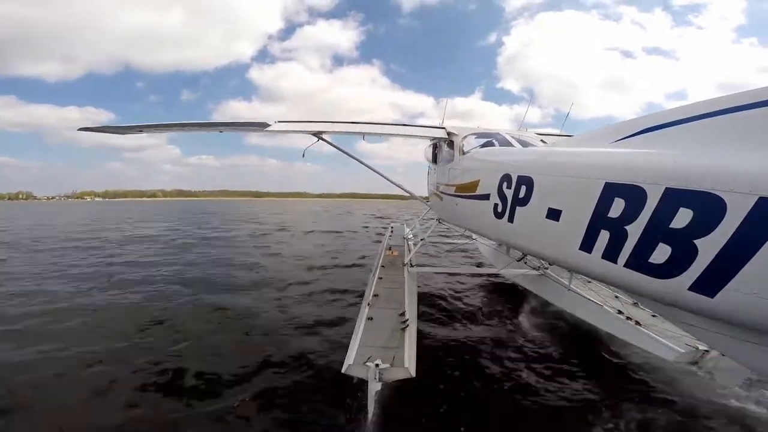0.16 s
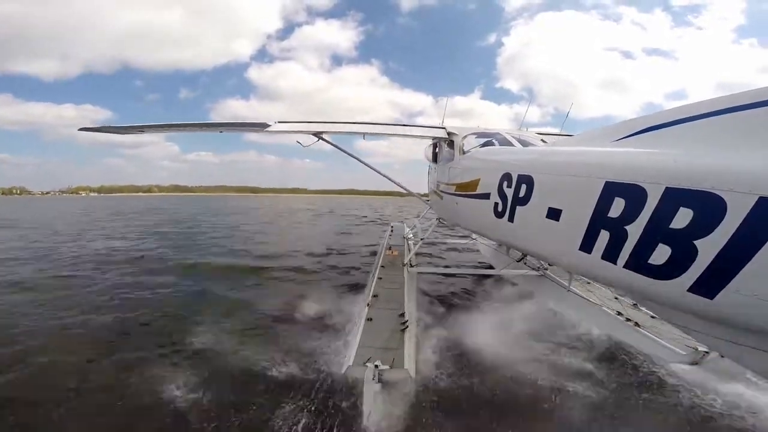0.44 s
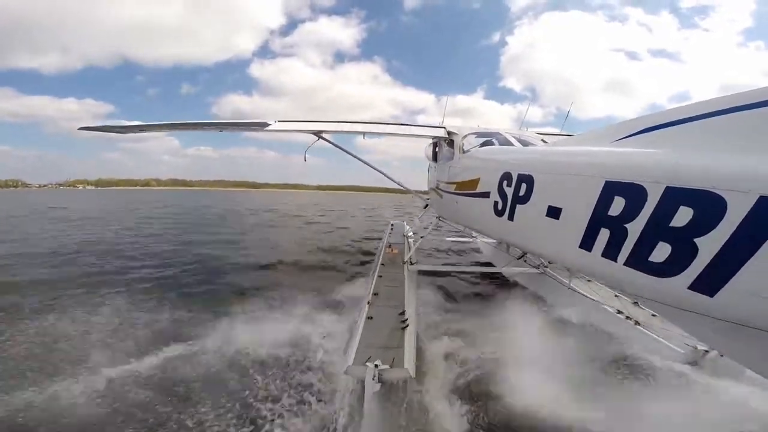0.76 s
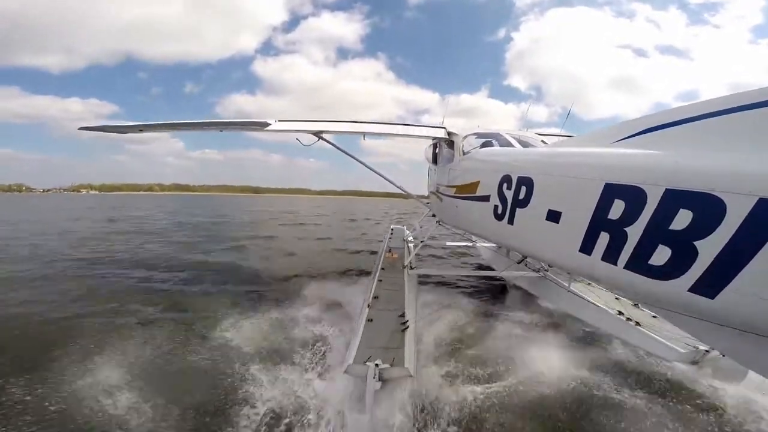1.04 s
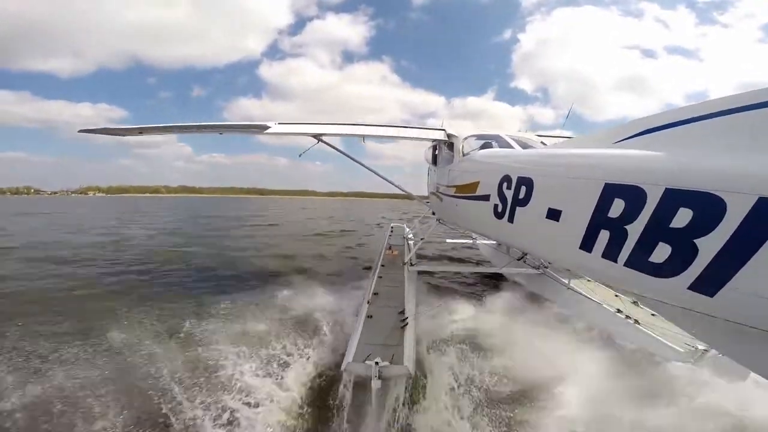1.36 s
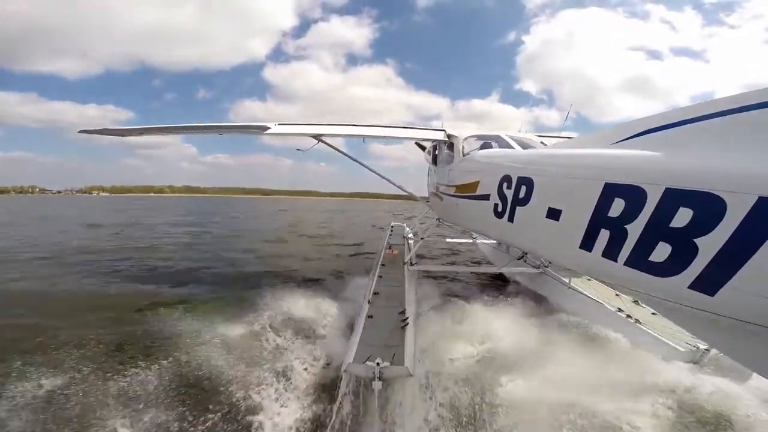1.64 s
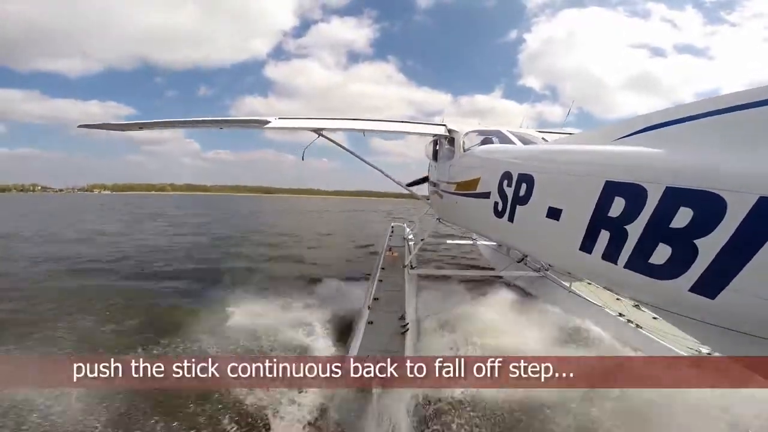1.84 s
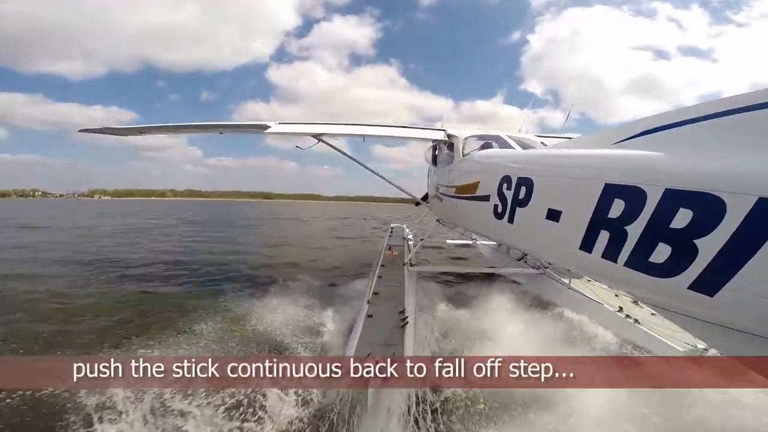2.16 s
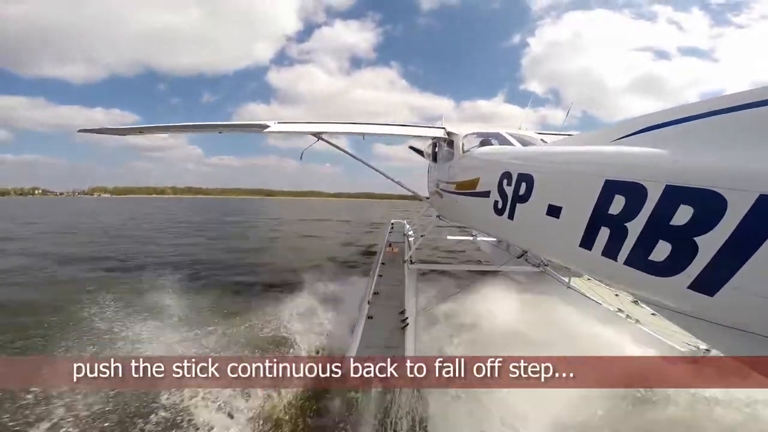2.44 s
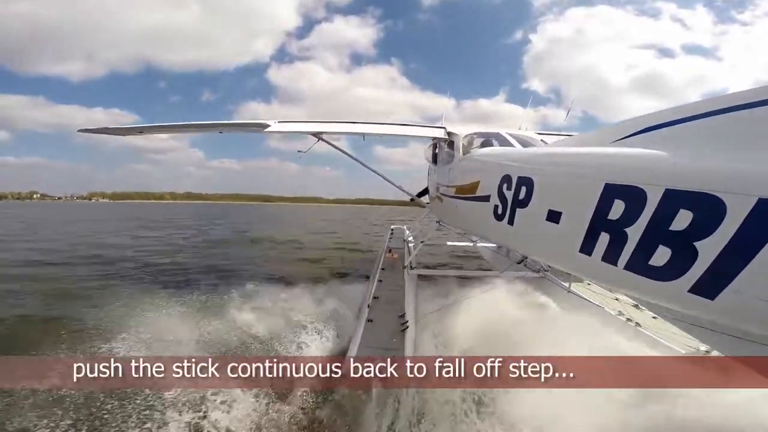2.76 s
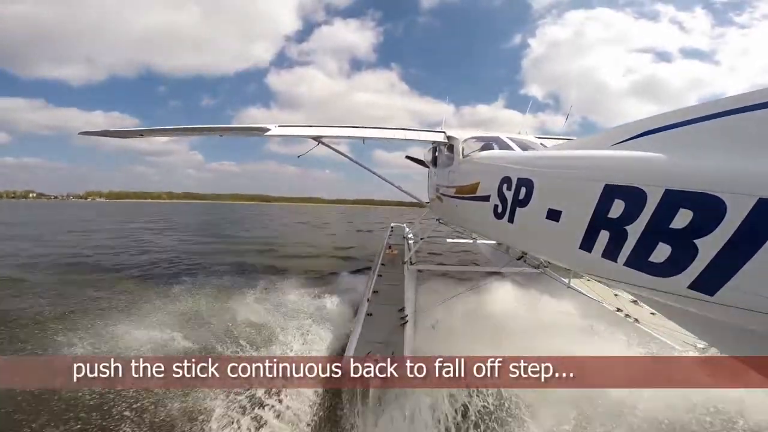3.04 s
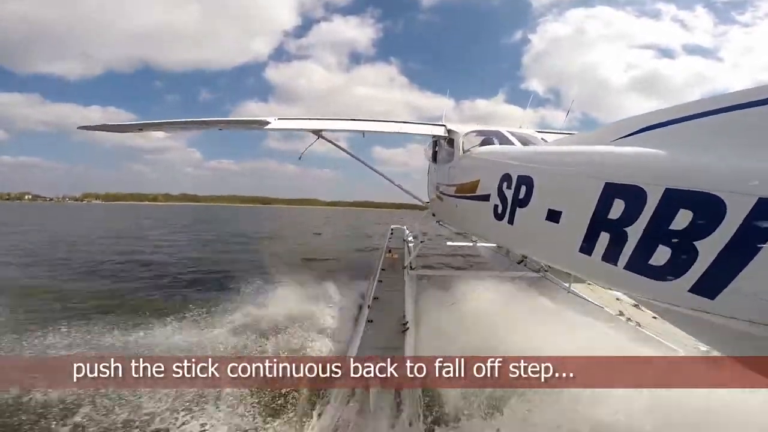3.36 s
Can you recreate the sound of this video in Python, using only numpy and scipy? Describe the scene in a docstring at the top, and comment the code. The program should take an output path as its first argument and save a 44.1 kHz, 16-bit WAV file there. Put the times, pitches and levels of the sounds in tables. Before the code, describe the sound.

A seaplane's floats hit lake water with gusts of spray and hollow, drumming slaps, after a short rush of air and engine hum. Drops tick on the enclosed microphone near the tail, and the body shudders deeply throughout.

```python
"""First comes rushing air, with a brief hum from an idling engine: a seaplane is settling on a lake,
heard from a closed housing near its tail. The air falls away as the floats touch the water.
Drops tick on the housing, spray comes in uneven gusts, and waves slap the hollow floats so that they drum.
Underneath, the whole time, the hull rumbles and the body of the plane shudders."""
import sys
import numpy as np
from scipy import signal
from scipy.fft import rfft, irfft, next_fast_len
from scipy.io import wavfile

SR = 44100
rng = np.random.default_rng(int(sys.argv[2]) if len(sys.argv) > 2 else 0)


def wrap_up_sound(samples):
    """Save the sound to the file named by the first command line argument, as 16-bit audio."""
    columns = np.atleast_2d(samples).T
    # keep every value between -1 and 1, then stretch to whole-number steps
    tamed = np.clip(columns, -1, 1)
    steps = np.round(tamed * 32767).astype(np.int16)
    wavfile.write(sys.argv[1], SR, steps)


N = 153909
T = np.arange(N) / SR


def from_db(db):
    """Turn decibels into a number to multiply by."""
    return 10 ** (np.asarray(db) / 20)


def rms_one(x):
    """Scale a signal so that its average power is 1."""
    return x / np.sqrt(np.mean(x ** 2) + 1e-20)


def in_time(rows):
    """Join rows of (time_s, values...) with straight lines, giving one curve per value."""
    times, *columns = np.transpose(rows)
    return [np.interp(T, times, column) for column in columns]


def drift(rate_hz):
    """A smooth random wobble, about 1 in size; a higher rate wobbles faster."""
    step = 40  # samples between random points
    r = np.exp(-2 * np.pi * step * rate_hz / SR)
    slow = signal.lfilter([1], [1, -2 * r, r * r], rng.standard_normal(N // step + 2002))[2000:]
    return np.interp(np.arange(N) / step, np.arange(len(slow)), rms_one(slow))


def coloured(x, points):
    """Shape the bass and treble of a signal with rows of (pitch_hz, gain_db); the result has power 1."""
    hz, db = np.transpose(points)
    size = next_fast_len(N + 8192)
    f = np.maximum(np.arange(size // 2 + 1) * SR / size, 1)
    octaves_outside = np.maximum(np.log2(hz[0] / f), 0) + np.maximum(np.log2(f / hz[-1]), 0)
    gain = from_db(np.interp(np.log(f), np.log(hz), db) - 30 * octaves_outside)
    return rms_one(irfft(rfft(x, size) * gain, size)[:N])


def resonance(x, hz, width_hz):
    """Make a signal ring at one pitch; a narrower width rings longer."""
    r = np.exp(-np.pi * width_hz / SR)
    feedback = [1, -2 * r * np.cos(2 * np.pi * hz / SR), r * r]
    return signal.lfilter(np.array([1, 0, -1]) * (1 - r * r) / 2, feedback, x + 1e-18)


def patter(per_s, spread_db):
    """Tiny hits of uneven size at random moments; the result has power 1."""
    sizes = from_db(spread_db * np.minimum(rng.exponential(1, N), 4)) * rng.choice([-1, 1], N)
    return rms_one(sizes * (rng.random(N) < per_s / SR))


def hum(rows, waver_hz):
    """A wavering tone that follows rows of (time_s, pitch_hz, level_db)."""
    hz, db = in_time(rows)
    phase = 2 * np.pi * np.cumsum(hz + waver_hz * drift(18)) / SR
    return np.sqrt(2) * from_db(db) * np.sin(phase)


def buffeting():
    """Wind and water push on the plane in low, lumpy gusts, over the deep rumble of the hull."""
    # loudness of the gusts and of the rumble: time_s, level_db
    gust_levels = [(0, -31.5), (.4, -36), (.64, -35.5), (.79, -41.5), (.92, -40), (1.2, -30.5), (1.41, -35),
                   (1.52, -34), (2.04, -39), (2.3, -35.5), (2.52, -44), (2.8, -30), (2.96, -35.5),
                   (3.12, -31.5), (3.21, -37.5), (3.34, -29.5), (3.45, -41.5)]
    rumble_levels = [(0, -31), (.35, -50), (.52, -23), (.9, -36.5), (1.15, -33.5), (1.45, -34), (1.85, -25),
                     (2.1, -28), (2.5, -29), (2.76, -24.5), (2.98, -23.5), (3.13, -29), (3.22, -36),
                     (3.36, -27), (3.49, -35.5)]
    # tone colour of each: pitch_hz, gain_db
    gust_colour = [(50, -8.5), (80, 0), (105, 0.5), (150, -1.5), (220, -6), (330, -11.5), (420, -20.5),
                   (800, -29.5)]
    rumble_colour = [(18, -1.5), (38, 0), (50, 2), (66, -8), (90, -9), (140, -37.5)]
    (gust_db,), (rumble_db,) = in_time(gust_levels), in_time(rumble_levels)
    gusts = from_db(gust_db + 2.0 * drift(18)) * coloured(rng.standard_normal(N), gust_colour)
    return gusts + from_db(rumble_db) * coloured(rng.standard_normal(N), rumble_colour)


def shudder():
    """The body of the plane sways at one low, wandering rate; no two swings are equally strong."""
    # how fast it sways: time_s, pitch_hz
    pitches = [(0.0, 30.5), (0.4, 31), (0.56, 34), (2.54, 33.0), (2.67, 27), (3.01, 26), (3.15, 32.5)]
    # how hard it sways: time_s, level_db
    levels = [(0.0, -19.5), (0.06, -19), (0.14, -35), (0.21, -21.5), (0.64, -19), (0.69, -23.5),
              (1.05, -23), (1.13, -24), (1.17, -23), (1.44, -21), (1.56, -32.5), (1.63, -21), (1.95, -20.5),
              (2.1, -23), (2.49, -21), (2.535, -30), (2.62, -18.5), (2.69, -33), (2.75, -22.5), (2.93, -21),
              (3.06, -27.5), (3.15, -19.5), (3.21, -25), (3.37, -18), (3.49, -21.5)]
    wander_hz, rough_db, octave_db = 0.26, 1.3, -23.5
    (hz,), (db,) = in_time(pitches), in_time(levels)
    phase = 2 * np.pi * np.cumsum(hz + wander_hz * drift(8.6)) / SR
    sway = np.cos(phase) + from_db(octave_db) * np.cos(2 * phase)
    return np.sqrt(2) * from_db(db + rough_db * drift(16)) * sway


def air_tone():
    """A faint tone rides on the rushing air and fades away."""
    # the tone: time_s, pitch_hz, level_db
    tone = [(0, 335, -39.5), (.4, 317.3, -52.5), (.7, 316, -70)]
    return hum(tone, waver_hz=6)


def engine():
    """The idling engine hums briefly, then sinks in pitch and fades."""
    # the engine's note: time_s, pitch_hz, level_db
    note = [(0, 151.1, -33), (.2, 159.2, -41), (.4, 149.8, -39), (.44, 143, -25.5), (.475, 142, -36),
            (.56, 140.1, -44), (.75, 139, -59)]
    return hum(note, waver_hz=4.3)


def air():
    """Air rushes over the housing, gritty with fine mist."""
    # loudness of the rush: time_s, level_db
    levels = [(0, -43.5), (.13, -37), (.33, -36), (.46, -36.5), (.505, -43.5), (.57, -48.5), (.68, -89),
              (.85, -72.5), (3.49, -75.5)]
    # its tone colour: pitch_hz, gain_db
    colour = [(250, -7.5), (325, -4), (450, -18), (560, -2.5), (780, -14.5), (1000, -5.5), (1420, -9.5),
              (2400, -8), (2950, -18), (3900, -23), (5900, -26.5), (8700, -34), (9700, -45), (13000, -46)]
    flutter_db = 1.8
    db, = in_time(levels)
    flow = rng.standard_normal(N) + patter(per_s=7000, spread_db=3)
    return from_db(db + flutter_db * drift(26)) * coloured(flow, colour)


def spray():
    """The floats throw up gusts of mist and drops; the finest droplets sizzle on and off."""
    # loudness of all the spray: time_s, level_db
    levels = [(.48, -47.5), (.62, -46.5), (.8, -57), (1.02, -44.5), (1.13, -39), (1.21, -46.5),
              (1.35, -42.5), (1.41, -51), (1.6, -42), (1.76, -44), (1.89, -44.5), (2.04, -57.5),
              (2.12, -50), (2.41, -44.5), (2.45, -53), (2.53, -53), (2.6, -47), (2.78, -43), (2.93, -45),
              (3.12, -43), (3.19, -55.5), (3.28, -45), (3.37, -50.5), (3.44, -60)]
    # the sizzle compared with the rest of the spray: time_s, gain_db
    sizzle_gains = [(1.3, -22), (1.65, -18), (1.95, -22.5), (2.45, -21.5), (2.85, -20)]
    # tone colour of the mist and drops, and of the sizzle: pitch_hz, gain_db
    water_colour = [(250, -5.5), (323, 6), (404, -15), (470, -0.5), (650, -4.5), (780, -15), (980, -6.5),
                    (1750, -8), (2450, -10.5), (2950, -18), (3900, -27), (4900, -31), (5410, -45),
                    (6800, -69.5), (12000, -74.5)]
    sizzle_colour = [(3000, -6), (4200, 11.5), (6500, 4.5), (8500, -10), (9500, -22.5), (13000, -22)]
    flutter_db, sizzle_flutter_db = 2, 7
    (db,), (sizzle_db,) = in_time(levels), in_time(sizzle_gains)
    mist = from_db(-4) * rng.standard_normal(N)
    drops = from_db(-9) * patter(per_s=3600, spread_db=3)
    flicker = from_db(sizzle_db + sizzle_flutter_db * np.clip(drift(17), -2, 1))
    sizzle = flicker * coloured(patter(per_s=4400, spread_db=-0.5), sizzle_colour)
    water = from_db(flutter_db * drift(17)) * coloured(mist + drops, water_colour)
    return from_db(db) * (water + sizzle)


def housing(rush):
    """The housing rings faintly with whatever rushes over it."""
    # pitches it rings at: pitch_hz, width_hz, gain_db
    rings = [(1165, 29, -8), (3600, 20, -14.5), (4520, 38, -3), (4950, 47, 9), (6000, 64, -9.5)]
    return rush + sum(from_db(db) * resonance(rush, hz, width) for hz, width, db in rings)


def drop_hits():
    """Single drops hit the housing: a sharp tick, a short spatter and a hollow knock."""
    # the drops: start_s, peak_db, lowest_hz, highest_hz
    drops = [(0.6526, -29, 200, 2570), (0.6543, -19, 180, 2460), (.662, -34, 200, 2480),
             (0.737, -31, 200, 2350), (0.7408, -20.5, 59, 2370), (0.7451, -22.5, 60, 1260),
             (2.9638, -31, 3460, 4940)]
    # hollow knock of the housing: pitch_hz, width_hz, gain_db
    knock = [(320, 110, 26), (530, 98, 0), (890, 160, 5), (1780, 620, 2.5)]
    spatter_db, spatter_fade_s = -20, 0.0023
    out, size = np.zeros(N), 2048
    for start_s, db, low_hz, high_hz in drops:
        hit = from_db(spatter_db) * rng.standard_normal(size) * np.exp(-T[:size] / spatter_fade_s)
        hit[0] -= 1  # the tick
        hit = hit + sum(from_db(gain_db) * resonance(hit, hz, width) for hz, width, gain_db in knock)
        hit = signal.sosfilt(signal.butter(10, high_hz, fs=SR, output="sos"), hit)
        hit = signal.sosfilt(signal.butter(4, low_hz, "high", fs=SR, output="sos"), hit)
        start = int(start_s * SR)
        out[start:start + size] += from_db(db) * hit / np.abs(hit).max()
    return out


def thumps():
    """Harder knocks come through the struts that hold the floats, as short, dull tones."""
    # the knocks: start_s, level_db, pitch_hz
    knocks = [(0.74, -18.5, 94.6), (1.136, -12, 110), (1.33, -14, 102), (1.484, -21, 107),
              (2.074, -28, 289), (2.29, -26.5, 133.5), (2.873, -20, 118), (3.115, -23, 312)]
    ring_s = 0.12  # time to fade by 60 dB
    out = np.zeros(N)
    for start_s, db, hz in knocks:
        age = np.maximum(T - start_s, 0)
        out += from_db(db - 60 * np.minimum(age / ring_s, 5)) * np.sin(2 * np.pi * hz * age)
    return out


def waves_on_floats():
    """Each wave is one big slap and a burst of small ones that splash and set the hollow floats drumming."""
    # waves striking the floats: start_s, length_s, level_db, extra_bass_db
    waves = [(0, 0.016, -33.5, 0), (0.619, 0.012, -31, 8), (0.801, 0.053, -40.5, 1.5),
             (0.983, 0.022, -25, -9.5), (1.011, 0.023, -23.5, -5.5), (1.055, 0.032, -20.5, 0),
             (1.085, 0.042, -22.5, -5), (1.126, 0.027, -23, 3), (1.159, 0.014, -30.5, -5),
             (1.325, 0.019, -21.5, -4.5), (1.349, 0.012, -23, -3), (1.413, 0.013, -28.5, -4),
             (1.472, 0.084, -28.5, -2), (2.07, 0.036, -29.5, -1), (2.109, 0.046, -33, 0),
             (2.596, 0.015, -35, 2.5), (2.706, 0.1, -36, 3), (2.857, 0.014, -27, -1.5),
             (2.876, 0.023, -23, -3.5), (2.966, 0.057, -35, 2), (3.099, 0.012, -36, 6),
             (3.264, 0.064, -39.5, 2)]
    # pitches the floats and struts ring at: pitch_hz, width_hz, gain_db
    rings = [(103.3, 27.3, 8.5), (155, 26, 8), (212.4, 22.4, 7), (272.7, 26, 2.5), (336, 22, 0.5),
             (399, 16, 3), (471, 23.2, 1), (571, 29.2, 2), (637, 70, -6), (1135, 50, -10)]
    # tone colour of the splash: pitch_hz, gain_db
    splash_colour = [(80, 12.5), (250, 6), (600, -5.5), (800, 0.5), (1300, -9), (2400, -14), (3000, -23.5),
                     (6000, -35), (10000, -74.5)]
    rise_s, fade_s, bass_under_hz = 0.0013, 0.0093, 300
    first_slap_db, splash_db = 21.5, -10  # compared with each wave's level
    slaps = patter(per_s=2200, spread_db=1.5)
    force, bass_force, splash_swell = np.zeros((3, N))
    for start_s, length_s, db, extra_bass_db in waves:
        age = T - start_s
        swell = np.clip(age / rise_s, 0, 1) * np.exp(-np.maximum(age - length_s, 0) / fade_s)
        push = swell * slaps
        push[int((start_s + rise_s) * SR)] += from_db(first_slap_db)
        force += from_db(db) * push
        bass_force += from_db(db + extra_bass_db) * push
        splash_swell += from_db(db) * swell
    drum = np.zeros(N)
    for k, (hz, width, db) in enumerate(rings):
        drive = bass_force if hz < bass_under_hz else force
        drum += (-1) ** k * from_db(db) * resonance(drive, hz, width)  # neighbours swing opposite ways
    drum = signal.sosfilt(signal.butter(2, 2000, fs=SR, output="sos"), drum)
    ring_power = sum(from_db(2 * db) * np.pi * width / SR for hz, width, db in rings)
    splash = from_db(splash_db) * splash_swell * coloured(slaps, splash_colour)
    return drum / np.sqrt(ring_power) + splash


def scene():
    """Air and water on the housing, plus all that comes through the body of the plane, in one channel."""
    rush = housing(air() + spray())
    hums = engine() + air_tone()
    return (rush + drop_hits() + waves_on_floats() + thumps() + buffeting() + shudder() + hums)[None]


def record(dry):
    """Cut away the very highest treble."""
    cutoff_hz = 14500
    return signal.sosfilt(signal.cheby2(12, 70, cutoff_hz, fs=SR, output="sos"), dry)


dry = scene()
out = record(dry)
wrap_up_sound(out)
```